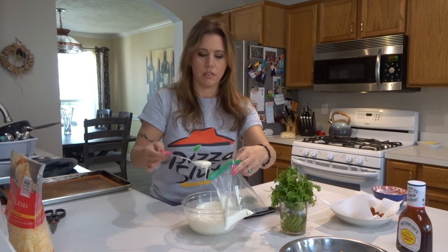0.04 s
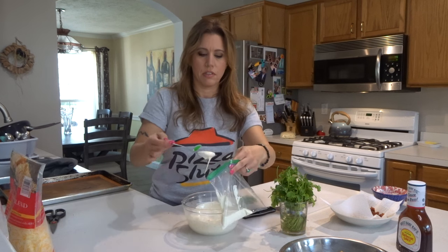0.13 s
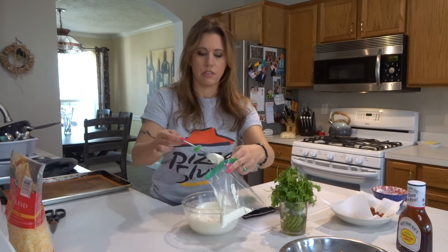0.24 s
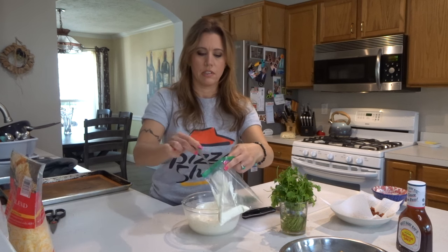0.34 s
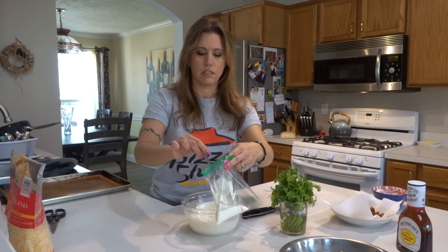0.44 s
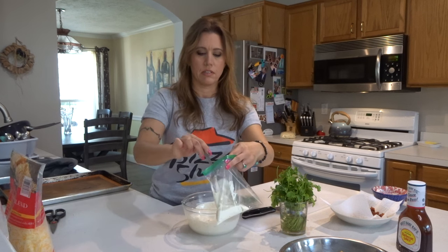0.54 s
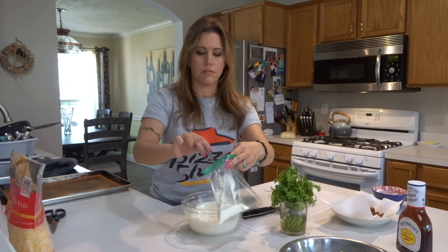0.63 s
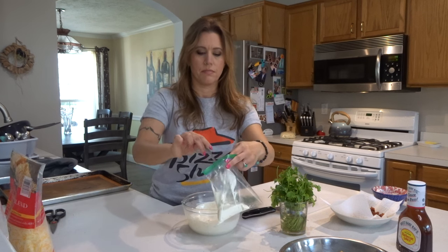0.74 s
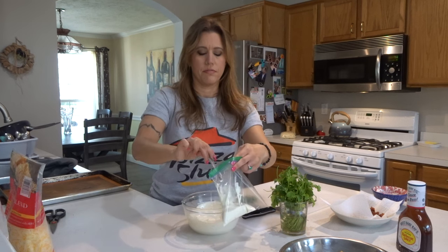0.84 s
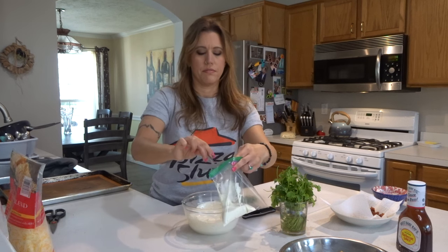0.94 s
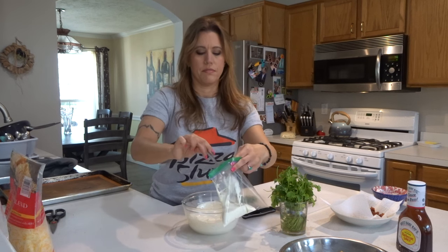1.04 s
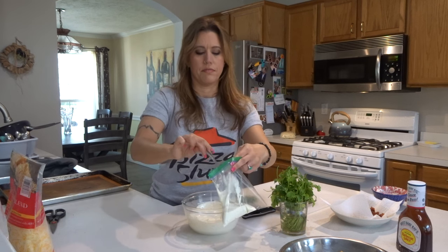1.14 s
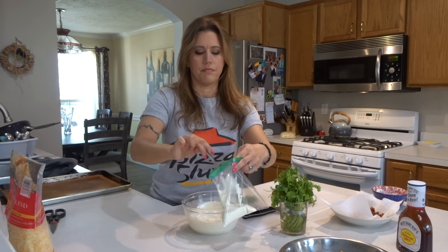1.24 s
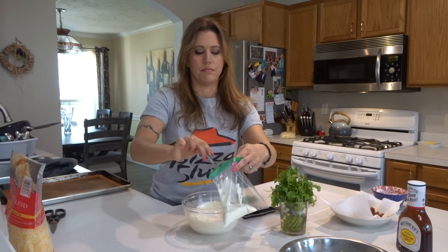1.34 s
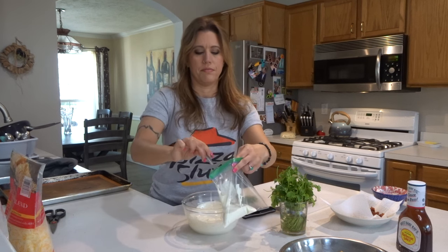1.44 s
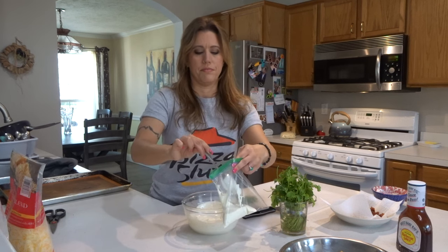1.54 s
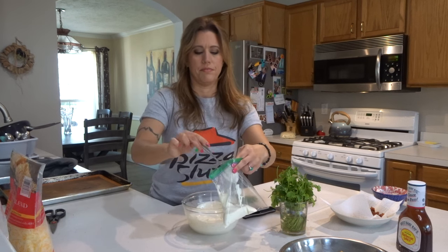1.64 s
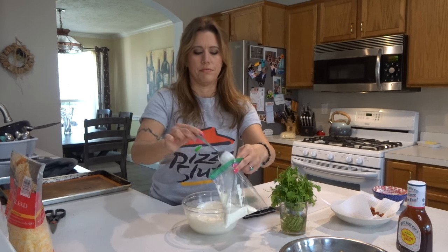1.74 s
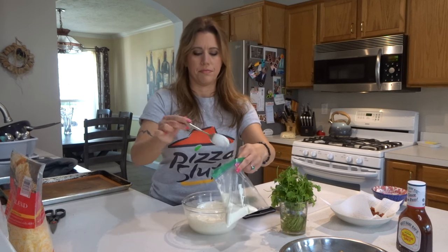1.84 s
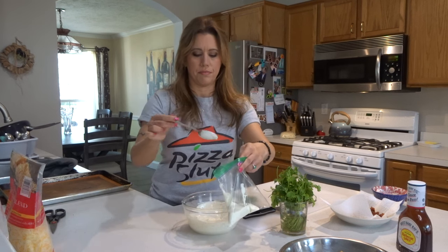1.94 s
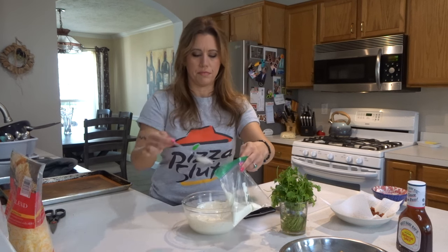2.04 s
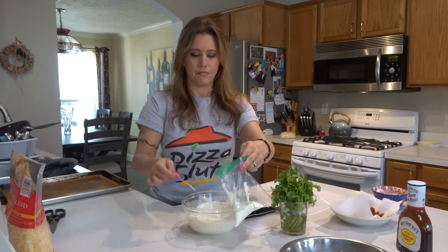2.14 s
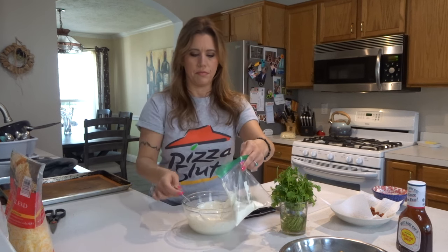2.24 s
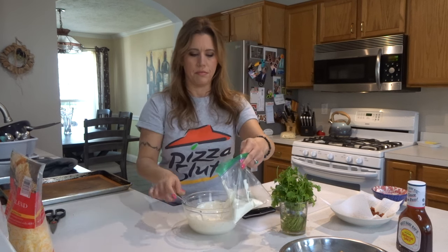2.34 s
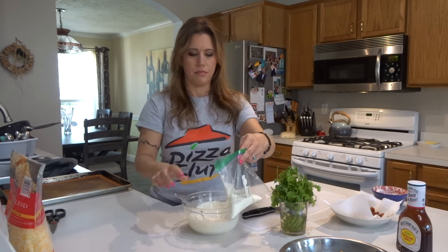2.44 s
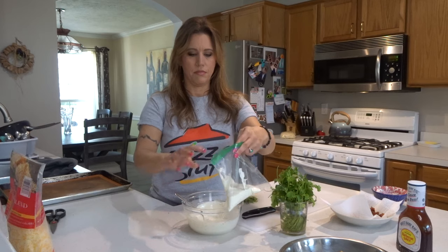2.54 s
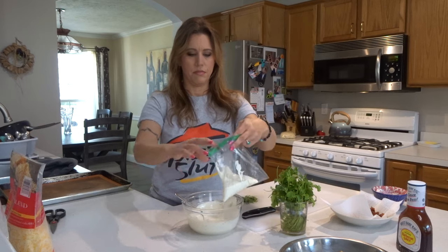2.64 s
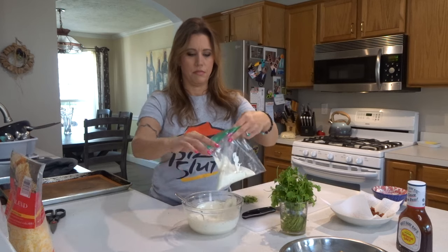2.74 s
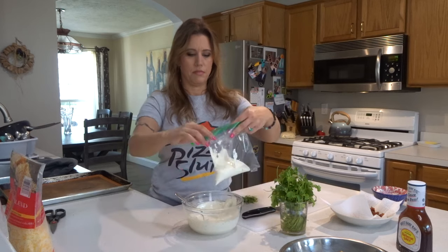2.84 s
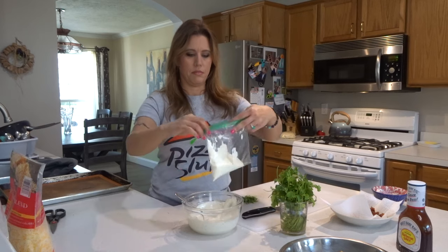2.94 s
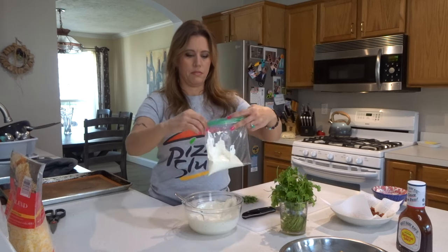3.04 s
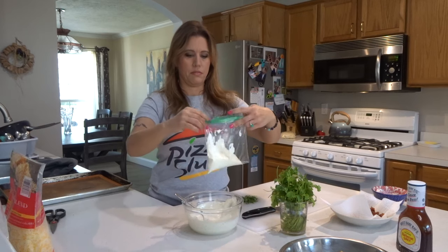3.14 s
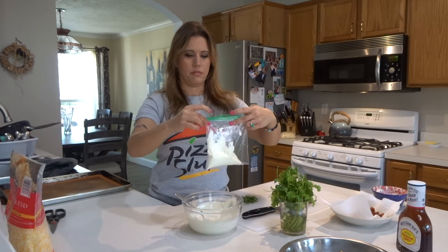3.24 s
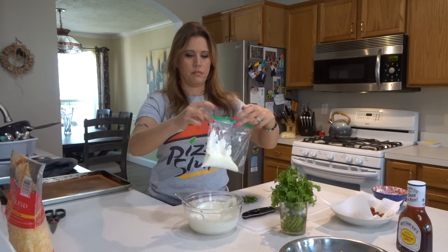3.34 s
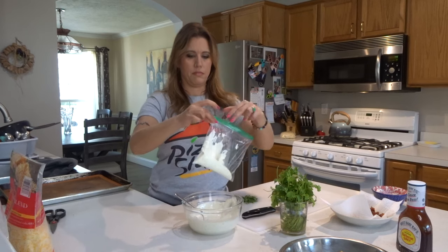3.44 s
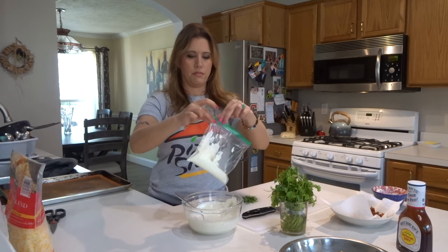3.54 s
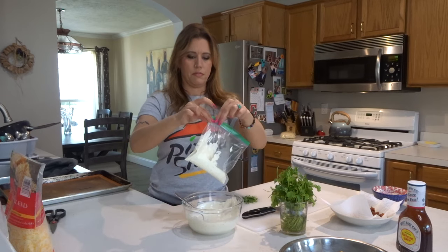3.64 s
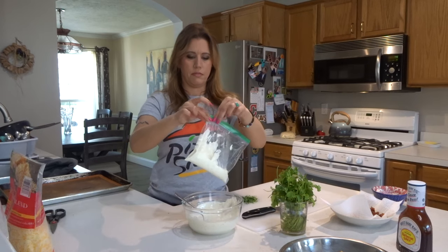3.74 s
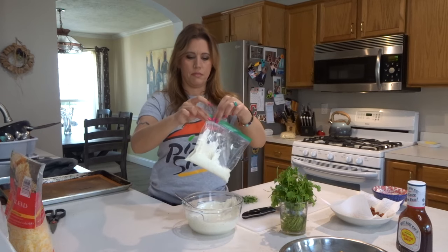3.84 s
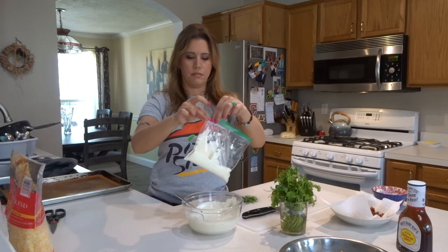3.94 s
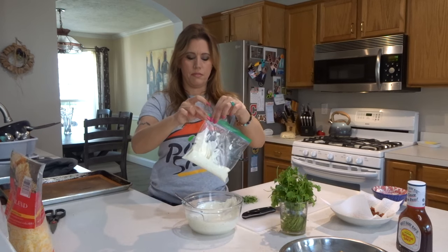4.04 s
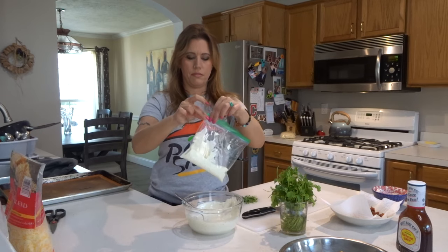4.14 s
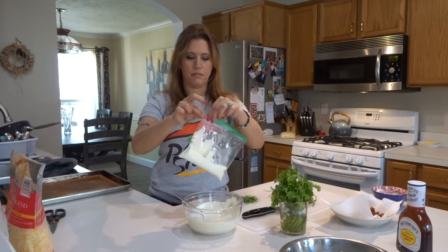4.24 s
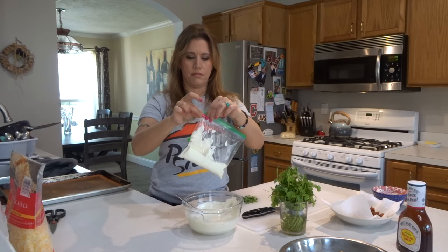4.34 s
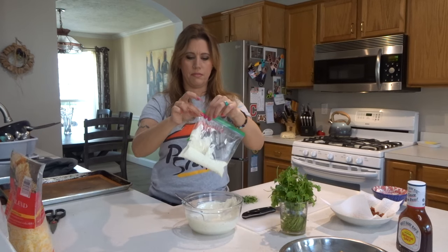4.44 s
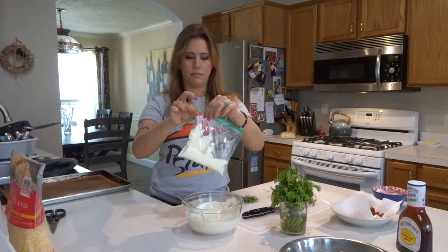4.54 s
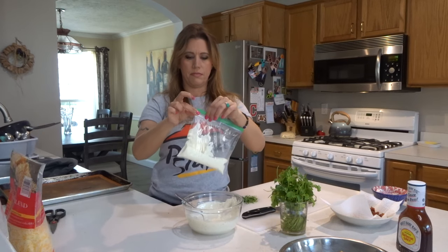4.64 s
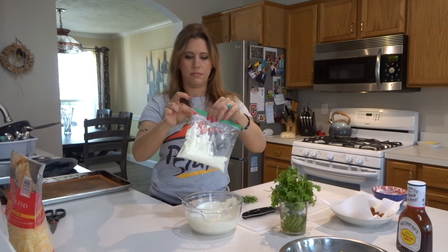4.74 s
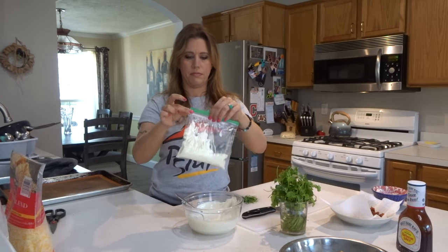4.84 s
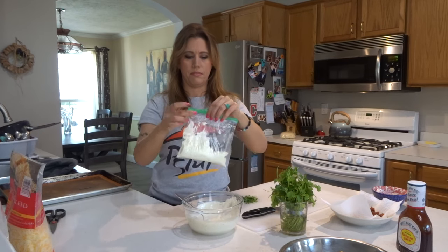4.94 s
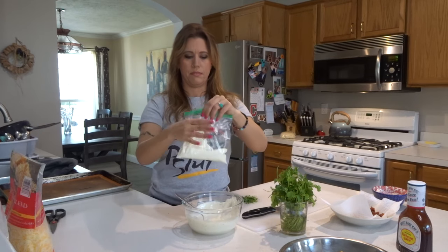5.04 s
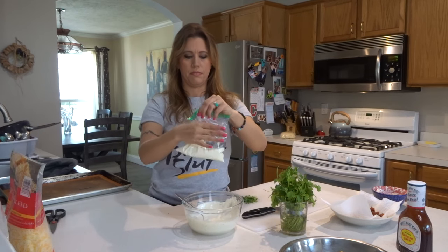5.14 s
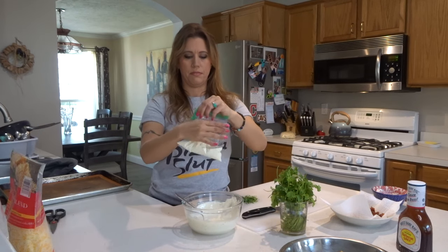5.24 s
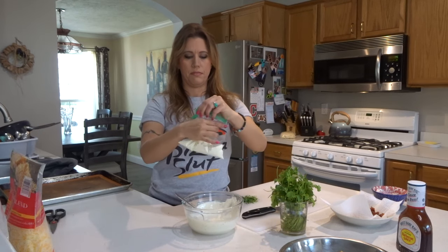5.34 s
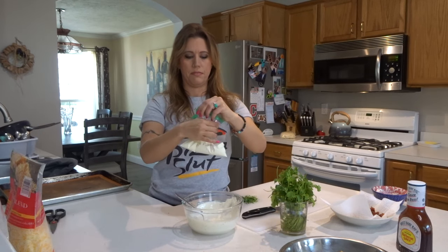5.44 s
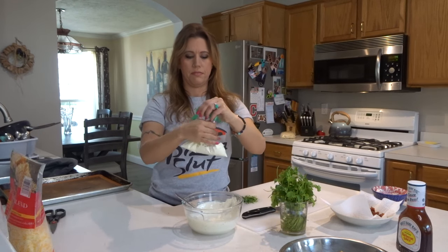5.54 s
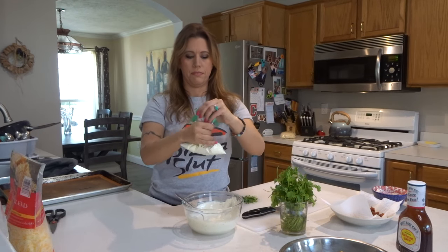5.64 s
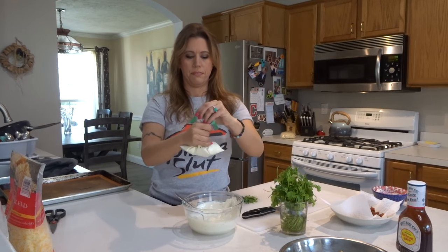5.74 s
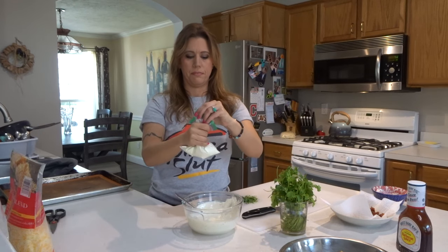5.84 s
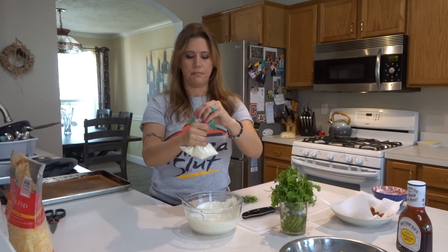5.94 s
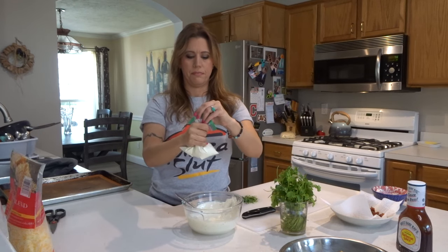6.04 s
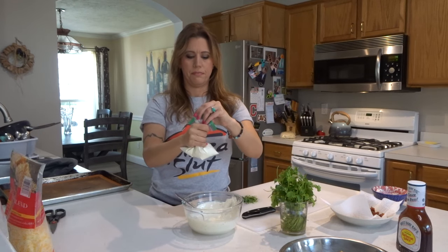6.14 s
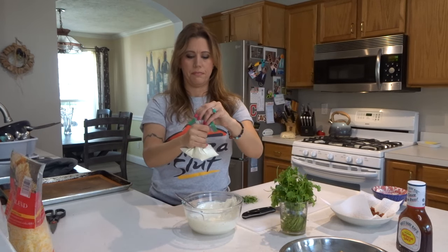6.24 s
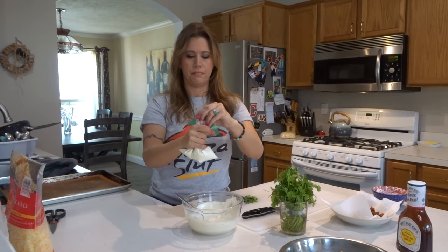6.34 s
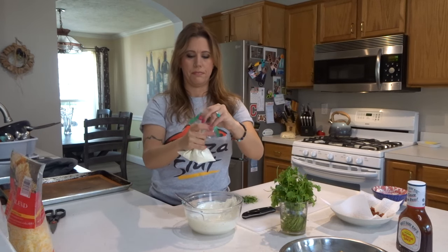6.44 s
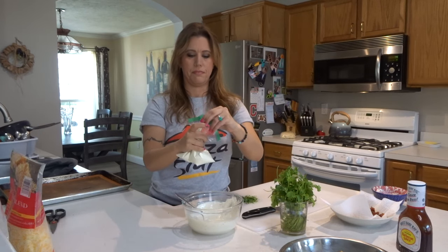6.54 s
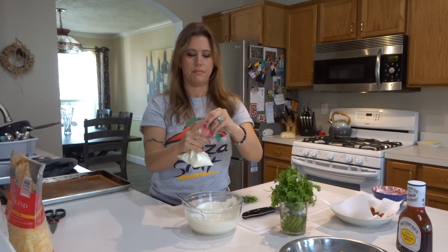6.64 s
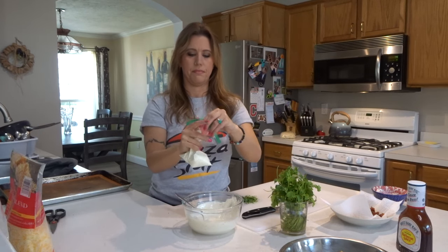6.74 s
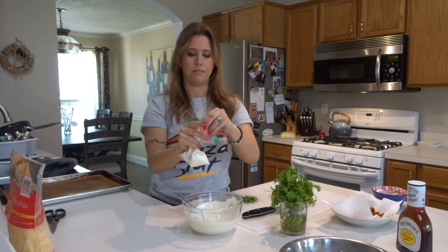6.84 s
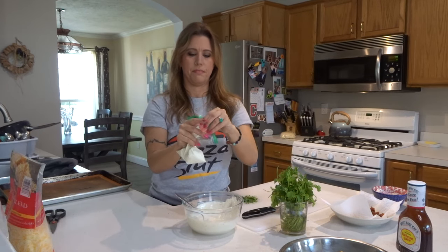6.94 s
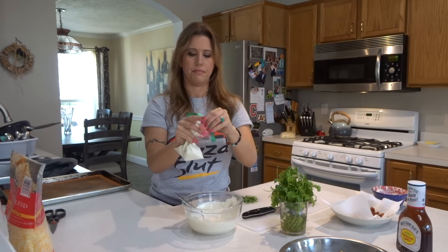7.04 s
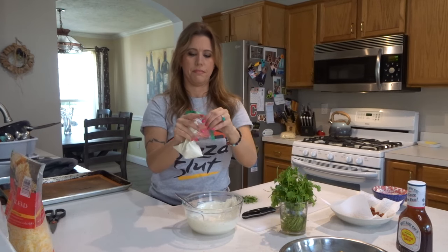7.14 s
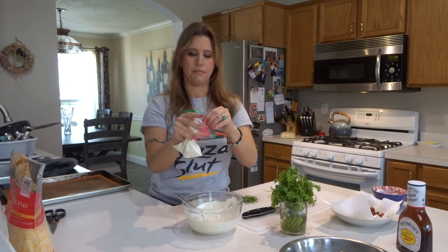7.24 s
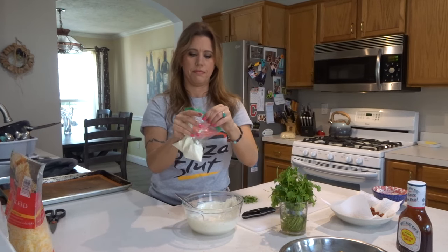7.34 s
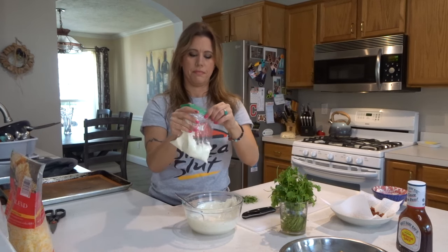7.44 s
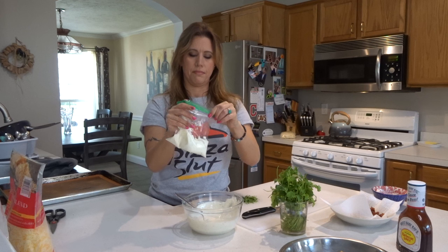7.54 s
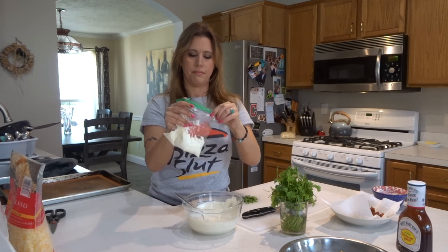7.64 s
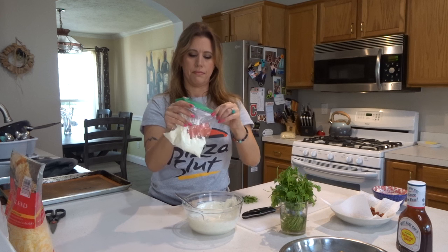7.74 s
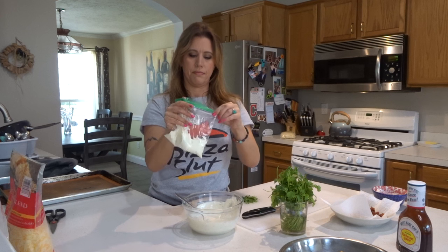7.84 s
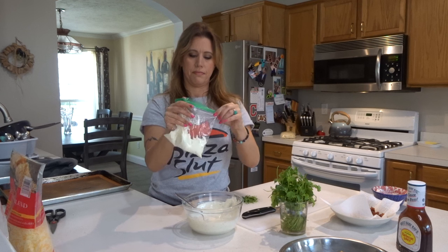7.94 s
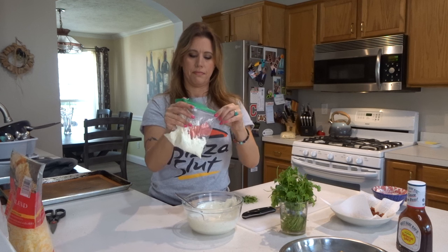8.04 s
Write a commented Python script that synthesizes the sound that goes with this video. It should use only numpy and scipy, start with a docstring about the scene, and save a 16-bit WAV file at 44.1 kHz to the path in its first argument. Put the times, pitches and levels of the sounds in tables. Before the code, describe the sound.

A spoon is put down with a ringing clink on glass, and a plastic zip bag crackles as it is squeezed and sealed.

```python
"""A thin plastic zip bag crinkles briefly in a home kitchen. A steel spoon is put down: it chatters against
a glass bowl, ringing both, and thumps the counter. Then the bag is lifted, squeezed empty of air and
sealed: single creases snap, small ones crackle under the fingers, whole panels fold with a hollow rustle.
The hard room answers every sound over the hum and hiss of appliances."""
import sys
import numpy as np
from scipy import signal
from scipy.fft import rfft, irfft, next_fast_len
from scipy.io import wavfile
from scipy.ndimage import map_coordinates

SR = 44100
rng = np.random.default_rng(int(sys.argv[2]) if len(sys.argv) > 2 else 0)


def materialize(psi):
    """Save the field psi as 16-bit PCM at rate SR to the path in sys.argv[1].

    A 1-D psi becomes a single channel; in a 2-D psi each row is a channel.
    """
    bounded = np.clip(np.atleast_2d(psi).T, -1, 1)
    quanta = np.round(bounded * 32767).astype(np.int16)
    wavfile.write(sys.argv[1], SR, quanta)


N = 357385
TOP_HZ = 11050

# spoon contacts: start_s, ring_db, favoured_hz, thump_db
CONTACTS = [(2.2876, -19.5, 4900, -24.5), (2.2923, -27.5, 6200, -31.5), (2.2954, -18.5, 4370, -29),
            (2.3019, -18, 2800, -24.5), (2.3125, -28, 4200, -21), (2.326, -36.5, 1680, -22.5),
            (2.3455, -21, 4300, -24)]
# modes of spoon and bowl together: pitch_hz, level_db, t60_s
CLINK_MODES = [(1565, -10, 0.23), (2813, -2.5, 0.25), (2920, -8, 0.054), (3080, -32, .15),
               (3292, -15, 0.27), (3860, -16, 0.24), (4260, -6, 0.14), (4334, -4.5, 0.18), (4600, -21, .15),
               (6190, -7, 0.12), (9470, -16, .12), (10430, -14, .12)]
# noise of a hard contact: freq_hz, level_db
CLASH_SPECTRUM = [(800, -15.5), (1250, -13.5), (1600, -5.5), (2400, -7), (3500, 0.5), (4500, 1.5),
                  (5000, -20), (5700, -4.5), (6900, -10.5), (8000, -22), (10700, -13.5)]
# modes of the counter: pitch_hz, level_db, t60_s
COUNTER_MODES = [(135.4, -9, 0.33), (217, -17, 0.17), (310, -12, 0.081), (350, -8.5, 0.12),
                 (493, -5.5, 0.13), (678, -8, 0.13), (850, -12, .1)]
# damped knock of the counter: freq_hz, level_db
THUD_SPECTRUM = [(60, -29), (125, -1), (230, -4.5), (380, -2), (550, -7.5), (950, -7), (1300, -19.5),
                 (2500, -38)]
# loudest single creases: start_s, energy_db, pitch_hz
SNAPS = [(0.3974, -22.5, 2120), (0.7157, -29.5, 3430), (2.675, -13.5, 2700), (2.748, -5, 2140),
         (2.778, -13.5, 2970), (2.8191, -11, 3032), (2.8498, -10.5, 3400), (2.8832, -9.5, 3400),
         (3.181, -16.5, 4000), (3.7184, -24, 2980), (4.1473, -27, 3000), (4.212, -5, 4600),
         (5.019, -12, 2000), (5.0747, -7, 2500), (5.214, -13.5, 6270), (5.3004, -11, 5570),
         (5.3114, -9.5, 5370), (5.3603, -7.5, 3132), (5.49, -9.5, 5100), (5.5737, -9.5, 5400),
         (5.7847, -20.5, 4230), (6.2616, -15, 4970), (6.335, -12, 4475), (6.3755, -11.5, 5107),
         (6.489, -6, 3486), (6.58, -9, 4170), (6.7305, -10, 5460), (6.7553, -10, 3497),
         (6.7693, -6.5, 3997), (6.8173, -13.5, 2900), (7.0643, -10.5, 3000), (7.1118, -9, 4824),
         (7.1409, -12, 3206), (7.2427, -12.5, 3540), (7.285, -8.5, 2907), (7.3596, -5, 3600),
         (7.5546, -8.5, 6845), (7.823, -15, 7120)]
# plastic film: freq_hz, level_db
FILM_SPECTRUM = [(120, -33.5), (250, -11.5), (420, -8.5), (800, -9.5), (1160, -9.5), (1680, -2), (2400, -5),
                 (3300, -4), (5000, -8), (7400, -8), (11000, -12.5)]
# finger grips on the film: start_s, crackle_db, hold_s
GRIPS = [(0.394, -55, .02), (.95, -66, .35), (2.73, -47, .17), (2.883, -34, .022), (2.98, -49, .065),
         (3.115, -49, .065), (3.262, -42.5, .022), (3.584, -52.5, 0.043), (4.62, -61, .32),
         (4.785, -53, .04), (5.045, -39, .035), (5.214, -42, .18), (5.47, -46.5, 0.28), (5.62, -40.5, .04),
         (6.315, -42.5, .52), (6.649, -41, .13), (7.137, -44, 0.022), (7.291, -41, 0.014),
         (7.364, -32.5, 0.058), (7.479, -41.5, 0.14)]
# tighter film crackles higher: time_s, pitch_hz
CRACKLE_PITCH = [(2.75, 3580), (3.2, 4400), (5.07, 3300), (5.4, 5060), (6.6, 5050), (6.85, 4180),
                 (7.4, 4400)]
# whole pouch crumpling: start_s, level_db, length_s
CRUSHES = [(0.379, -52.5, 0.062), (2.871, -54, 0.096), (5.354, -41, 0.018), (7.349, -41.5, 0.068)]
# hollow rustle of the pouch: freq_hz, level_db
POUCH_SPECTRUM = [(70, -48), (180, -16), (290, 2.5), (470, -1.5), (900, -5.5), (1500, -10), (4000, -25)]
# room decay: freq_hz, t60_s
ROOM_DECAY = [(150, 0.46), (600, 1), (2500, 0.62), (5000, 0.6), (10000, 0.44)]
# left-right likeness of diffuse sound: freq_hz, coherence
COHERENCE = [(60, 0.97), (300, 0.93), (800, 0.43), (2000, 0.71), (4800, 0.01), (11000, 0)]
# moving air: freq_hz, level_db
AIR_SPECTRUM = [(20, -23), (40, -10.5), (54, -3.5), (80, -10), (120, -6.5), (180, -4.5), (270, -3),
                (400, -4.5), (560, -11.5), (760, -15.5), (1000, -11.5), (1300, -19.5), (4300, -23.5),
                (11000, -34.5)]
# appliance motors: pitch_hz, level_db
MOTOR_TONES = [(53.8, -62.5), (119, -64.5), (258, -62), (312, -65.5), (565, -67), (662, -71.5),
               (937, -74.5), (3564, -79.5), (4360, -78.5), (4414, -74.5), (6250, -82)]


def spoon_clink(clash_db=-3, clash_t60_s=.059, off_centre_db=10, width_hz=9):
    """Each contact clashes and rings steel and glass, most near the pitch its contact point favours."""
    out, t = np.zeros(N), np.arange(SR * 3 // 4) / SR
    mode_hz = np.transpose(CLINK_MODES)[0]
    blows_db = []
    for start_s, ring_db, favoured_hz, _ in CONTACTS:
        octaves = np.abs(np.log2(mode_hz / favoured_hz))
        blows_db.append(ring_db - off_centre_db * np.tanh(2 * octaves))
        clash = rng.standard_normal(len(t)) * amp(ring_db + clash_db - 60 * t / clash_t60_s)
        add(out, start_s, coloured(clash, CLASH_SPECTRUM))
    add(out, CONTACTS[0][0], struck_modes(CLINK_MODES, blows_db, t, width_hz))
    return out


def counter_thump(modes_db=-9, thud_db=-2, rise_s=.0048, thud_t60_s=.082, width_hz=4.5):
    """Each spoon contact pushes the counter: a damped knock plus low modes."""
    out, t = np.zeros(N), np.arange(SR * 3 // 4) / SR
    blows_db = []
    for start_s, _, _, thump_db in CONTACTS:
        blows_db.append(np.array([thump_db + modes_db]))
        knock = amp(thump_db + thud_db - 60 * t / thud_t60_s) * (1 - np.exp(-t / rise_s))
        add(out, start_s, coloured(rng.standard_normal(len(t)) * knock, THUD_SPECTRUM))
    add(out, CONTACTS[0][0], struck_modes(COUNTER_MODES, blows_db, t, width_hz))
    return out


def struck_modes(modes, blows_db, t, width_hz):
    """Contacts add decaying energy to each mode; loosely touching parts make its phase wander."""
    hz, level_db, t60_s = np.transpose(modes)[:, :, None]
    energy = 0
    for contact, blow_db in zip(CONTACTS, blows_db):
        age_s = CONTACTS[0][0] + t - contact[0]
        energy += (age_s >= 0) * amp(level_db + blow_db[:, None] - 60 * np.abs(age_s) / t60_s) ** 2
    wander = np.cumsum(rng.standard_normal((len(hz), len(t))), 1) * np.sqrt(2 * np.pi * width_hz / SR)
    return (np.sqrt(energy) * np.sin(2 * np.pi * hz * t + wander)).sum(0)


def bag_snaps(focus_db=9, focus_octaves=.99, flutter_s=.0015, flutter_s_per_db=.00012):
    """A crease buckles in a brief flutter, longer if soft, coloured by the size of the panel beside it."""
    out, t = np.zeros(N), np.arange(SR // 30) / SR
    film_hz, film_db = np.transpose(FILM_SPECTRUM)
    hardest_db = max(db for _, db, _ in SNAPS)
    for start_s, energy_db, pitch_hz in SNAPS:
        life_s = flutter_s + flutter_s_per_db * (hardest_db - energy_db)
        spectrum = rfft(rng.standard_normal(len(t)) * np.exp(-t / life_s), 2 * len(t))
        # slack film has no lasting modes: flatten the spectrum
        flutter = np.roll(irfft(spectrum / np.abs(spectrum) ** .6), len(t))
        panel_db = focus_db * np.exp(-(np.log2(film_hz / pitch_hz) / focus_octaves) ** 2)
        snap = coloured(flutter, np.c_[film_hz, film_db + panel_db])
        snap = filtered(snap, lambda hz: hz < TOP_HZ)
        add(out, start_s - len(t) / SR, amp(energy_db) * snap / np.linalg.norm(snap))
    return out


def bag_crackle(gain_db=-1, creases_per_s=900, spread_db=2.5, decay_cycles=1.67, clump_db=5, clump_hz=130):
    """Small creases give way in clumps, more and louder as the fingers press; film slides on film."""
    level = grip_strength()
    density_per_s = creases_per_s * np.sqrt(level / amp(-40))
    level = level * unit(amp(clump_db * np.tanh(wobble(clump_hz))))
    starts = np.flatnonzero(rng.random(N) < density_per_s / SR)
    size, detune, polarity = np.clip(rng.standard_normal((len(starts), 3)), -2, 2).T
    gain = unit(amp(spread_db * size)) * np.sign(polarity)
    gain *= level[starts] * np.sqrt(SR / density_per_s[starts])
    # creases of one clump share a panel, and so a pitch
    panel_hz = np.interp(np.arange(N) / SR, *np.transpose(CRACKLE_PITCH))
    panel_hz *= np.exp(.33 * wobble(clump_hz / 2))
    crease_hz = np.clip(panel_hz[starts] * np.exp(.39 * detune), 500, TOP_HZ)
    offsets = np.arange(SR // 200)
    cycles = crease_hz[:, None] * offsets / SR
    grains = np.cos(2 * np.pi * cycles) * np.exp(-cycles / decay_cycles)
    grains /= np.linalg.norm(grains, axis=1, keepdims=True)
    grains[:, 0] += .99  # onset tick
    creases = np.bincount((starts[:, None] + offsets).ravel(), (gain[:, None] * grains).ravel(), N)[:N]
    sliding = .5 * level * rng.standard_normal(N)
    film = filtered(coloured(creases + sliding, FILM_SPECTRUM), lambda hz: hz < TOP_HZ)
    return amp(gain_db) * unit(film) * np.sqrt(np.mean(level ** 2))


def grip_strength(held_db=-73, press_s=.014, release_s=.016, settle_db=-17, settle_s=.075):
    """Crackle envelope: each grip closes, holds and lets go, then the creased film goes on unfolding."""
    t = np.arange(N) / SR
    power = np.full(N, amp(held_db) ** 2)
    for start_s, crackle_db, hold_s in GRIPS:
        before_s, after_s = np.maximum(start_s - t, 0), np.maximum(t - start_s - hold_s, 0)
        letting_go = np.maximum(np.exp(-after_s / release_s), amp(settle_db) * np.exp(-after_s / settle_s))
        power += (amp(crackle_db) * np.exp(-before_s / press_s) * letting_go) ** 2
    return np.sqrt(power)


def bag_crushes():
    """Large panels of the filled pouch fold at once: a short, hollow rustle."""
    out = np.zeros(N)
    for start_s, level_db, length_s in CRUSHES:
        swell = np.sqrt(np.abs(np.hanning(round(length_s * SR))))
        add(out, start_s, amp(level_db) * swell * rng.standard_normal(len(swell)))
    return coloured(out, POUCH_SPECTRUM)


def kitchen(x, wet_db, spans=16):
    """x in the room; echoes are redrawn for each span, as the hands move about."""
    out = np.zeros((2, N))
    for span in np.array_split(np.arange(N), spans):
        if np.abs(x[span]).max() > 1e-6:
            stereo = signal.fftconvolve(x[span][None], room_response(wet_db), axes=1)
            for track, heard in zip(out, stereo):
                add(track, span[0] / SR, heard)
    return out


def room_response(wet_db, treble_db=3, early_db=-9, echoes=9, rise_s=.00048):
    """Direct sound, quick echoes off the counter and things on it, then the diffuse tail."""
    hz, t, noise = signal.stft(rng.standard_normal((2, SR * 3 // 4)), SR, nperseg=256)
    beam_db = treble_db * np.minimum(hz / TOP_HZ, 1)[:, None]  # treble is beamed at the walls
    decay_db = 60 * t / along(ROOM_DECAY, hz)[:, None]
    tail = signal.istft(noise * amp(beam_db - decay_db), SR, nperseg=256)[1]
    tail = diffuse(tail * (1 - np.exp(-np.arange(tail.shape[1]) / SR / rise_s)))
    response = amp(wet_db) * tail / np.linalg.norm(tail[0])
    for delay_s, skew in zip(rng.uniform(.002, .016, echoes), rng.integers(-2, 3, echoes)):
        response[[0, 1], round(delay_s * SR) + np.array([0, skew])] += amp(early_db) / np.sqrt(echoes)
    response[:, 0] += 1
    return response


def appliances(air_db=-52.5, waver_hz=7):
    """Moving air and slightly unsteady motor tones fill the room."""
    air = filtered(rng.standard_normal((2, N)), lambda hz: amp(along(AIR_SPECTRUM, hz)))
    hum, t = np.zeros(N), np.arange(N) / SR
    for hz, level_db in MOTOR_TONES:
        waver_rad = .205 * np.log10(hz) * wobble(waver_hz * np.sqrt(hz / MOTOR_TONES[1][0]))
        hum += amp(level_db) * np.sqrt(2) * np.sin(2 * np.pi * hz * t + waver_rad)
    return amp(air_db) * unit(diffuse(air)) + hum


def diffuse(pair):
    """Two unrelated signals as a diffuse field: left and right alike in the bass, apart in the treble."""
    def weights(hz):
        angle = np.arccos(np.clip(along(COHERENCE, hz), -1, 1)) / 2
        return np.array([np.cos(angle), np.sin(angle)])
    mid, side = filtered(pair, weights)
    return np.array([mid + side, mid - side])


def amp(db):
    """Decibels to gain."""
    return 10 ** (np.asarray(db) / 20)


def unit(x):
    """x at rms 1."""
    return x / np.sqrt(np.mean(x ** 2) + 1e-20)


def along(points, hz):
    """(freq_hz, value) points read on a log axis."""
    freq_hz, values = np.transpose(points)
    return np.interp(np.log(hz + 1), np.log(freq_hz + 1), values)


def wobble(rate_hz):
    """Smooth random curve, rate_hz knots a second."""
    knots = rng.standard_normal(int(N * rate_hz / SR) + 4)
    return map_coordinates(knots, [np.arange(N) * rate_hz / SR])


def filtered(x, response):
    """Zero-phase filter with gain response(hz)."""
    n = x.shape[-1]
    size = next_fast_len(n + SR // 4)
    return irfft(rfft(x, size) * response(np.fft.rfftfreq(size, 1 / SR)), size)[..., :n]


def coloured(x, spectrum, size=1024):
    """Minimum-phase filter of energy 1, shaped by (freq_hz, level_db) points."""
    gain = amp(along(spectrum, np.fft.rfftfreq(size, 1 / SR)))
    cepstrum = irfft(np.log(gain))
    cepstrum[1:size // 2] *= 2
    cepstrum[size // 2 + 1:] = 0
    kernel = irfft(np.exp(rfft(cepstrum)))
    return signal.fftconvolve(x, kernel / np.linalg.norm(kernel))[:len(x)]


def add(track, start_s, sound):
    """Mix sound into track at start_s."""
    part = track[max(round(start_s * SR), 0):][:len(sound)]
    part += sound[:len(part)]


def scene():
    """Spoon and bag a touch right of centre, over the appliances."""
    spoon = kitchen(spoon_clink(), wet_db=1.5) + kitchen(counter_thump(), wet_db=-2)
    bag = kitchen(bag_snaps(), wet_db=-2.5) + kitchen(bag_crackle() + bag_crushes(), wet_db=-.5)
    return (spoon + bag) * amp([[-.4], [.1]]) + appliances()


def record(dry):
    """Steep low-pass at TOP_HZ."""
    return filtered(dry, lambda hz: 1 / np.sqrt(1 + (hz / TOP_HZ) ** 260))


dry = scene()
out = record(dry)
materialize(out)
```